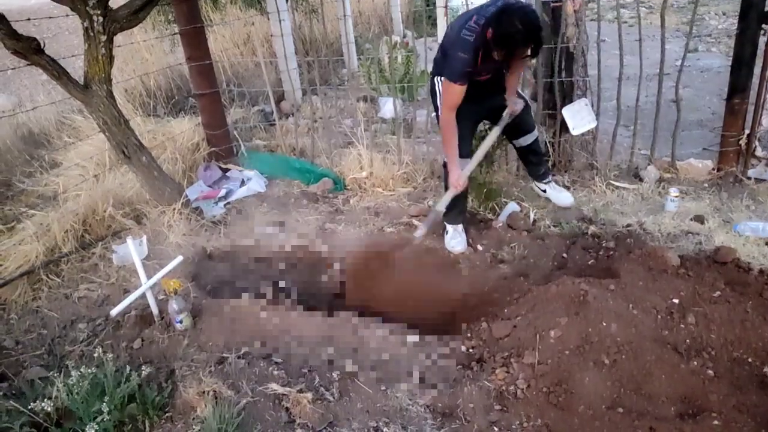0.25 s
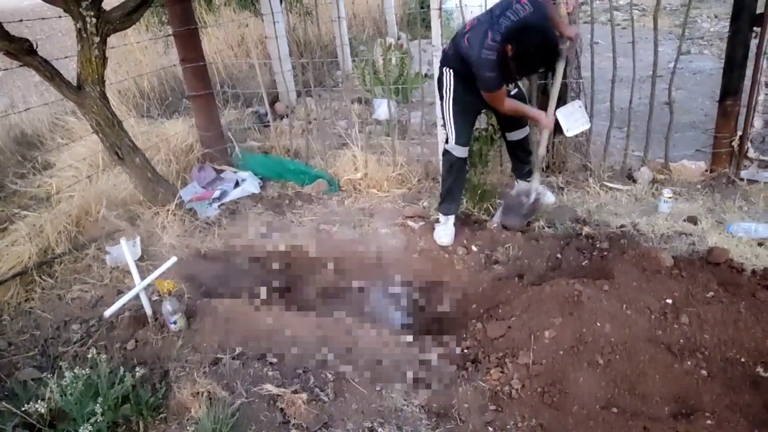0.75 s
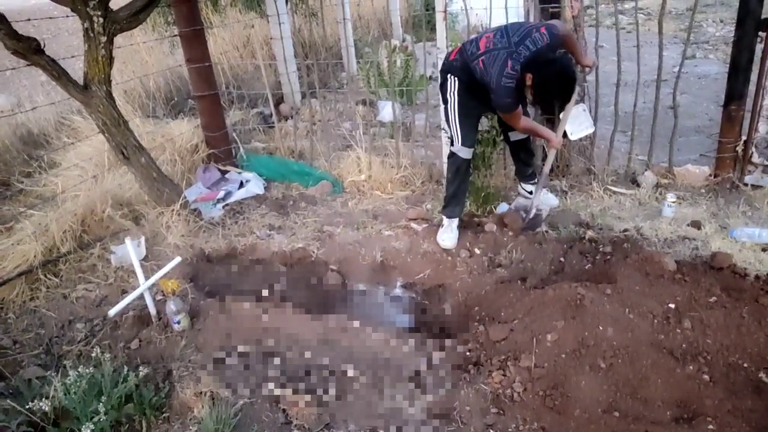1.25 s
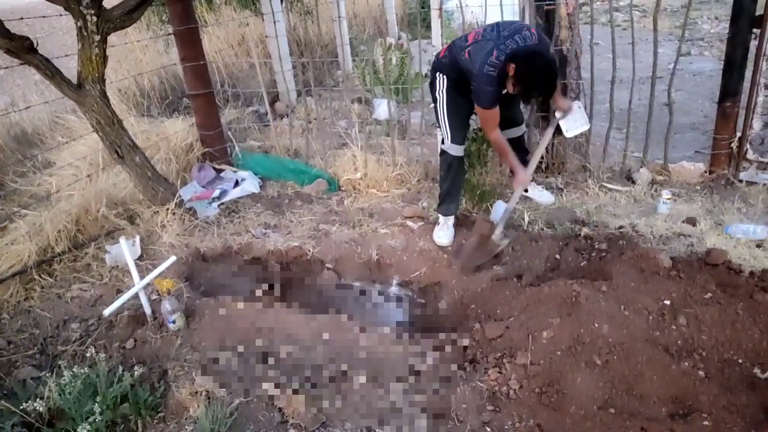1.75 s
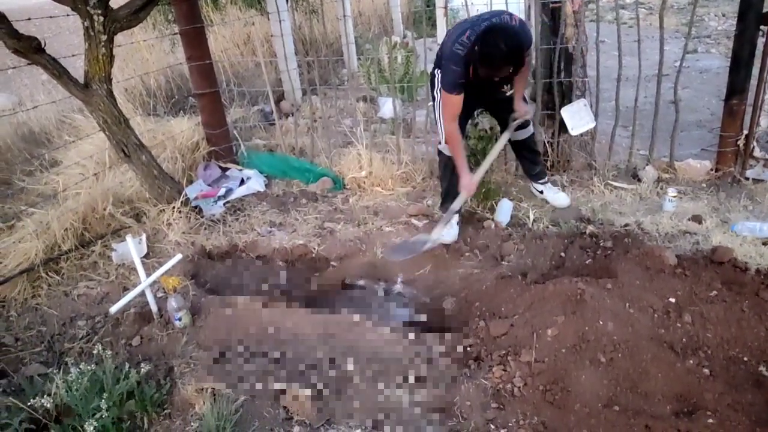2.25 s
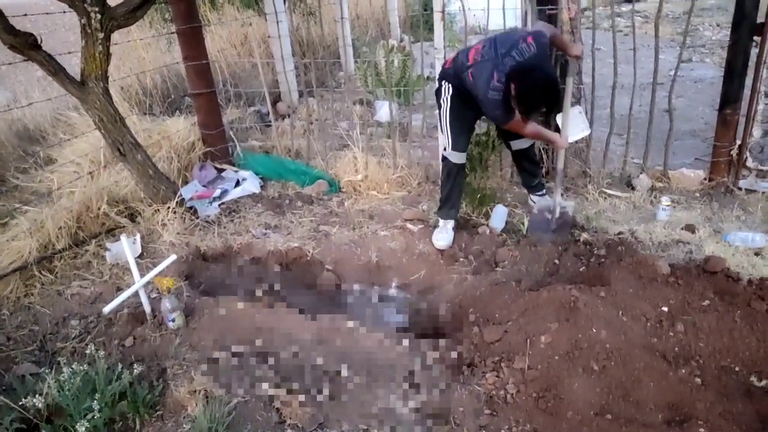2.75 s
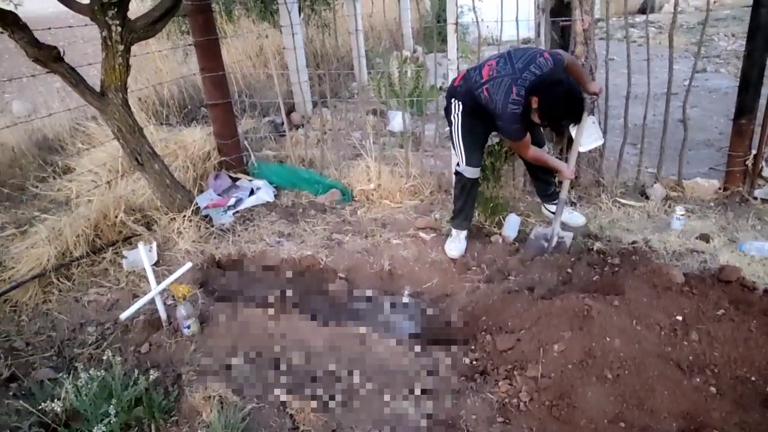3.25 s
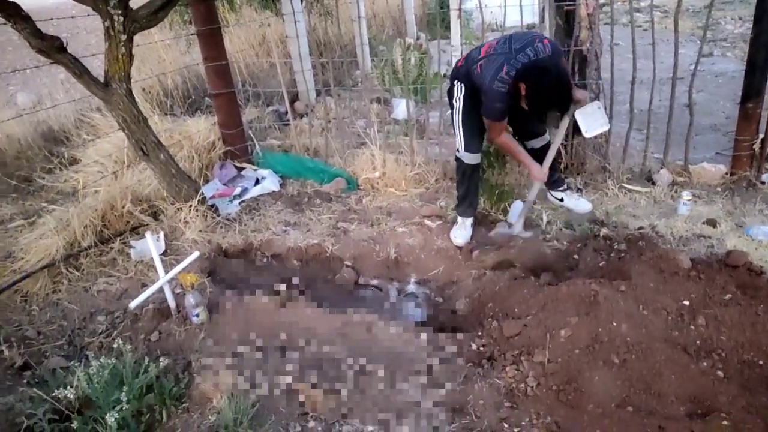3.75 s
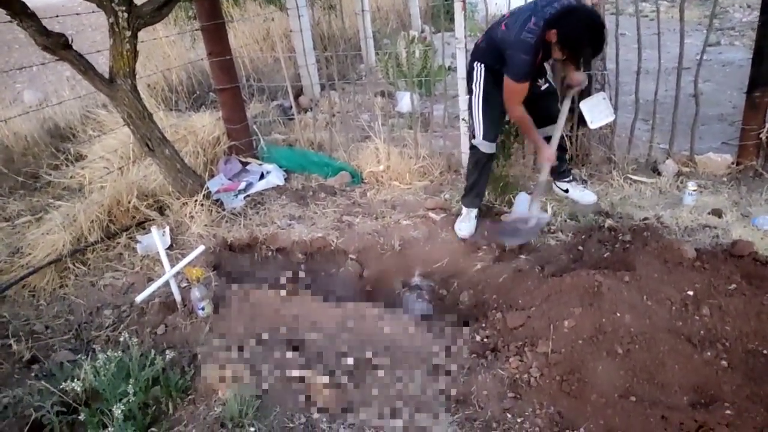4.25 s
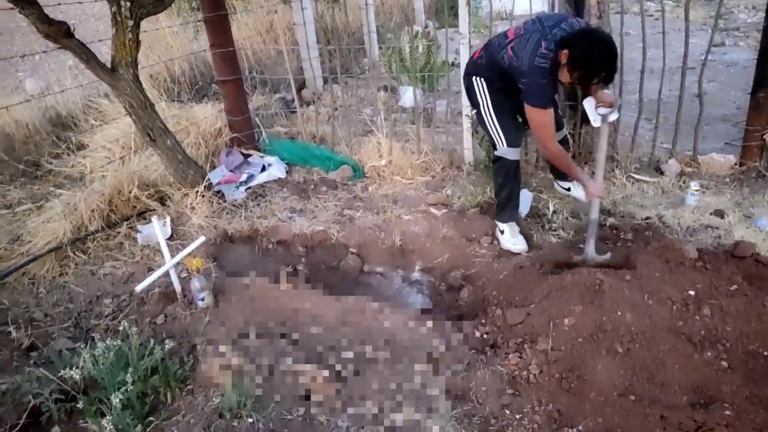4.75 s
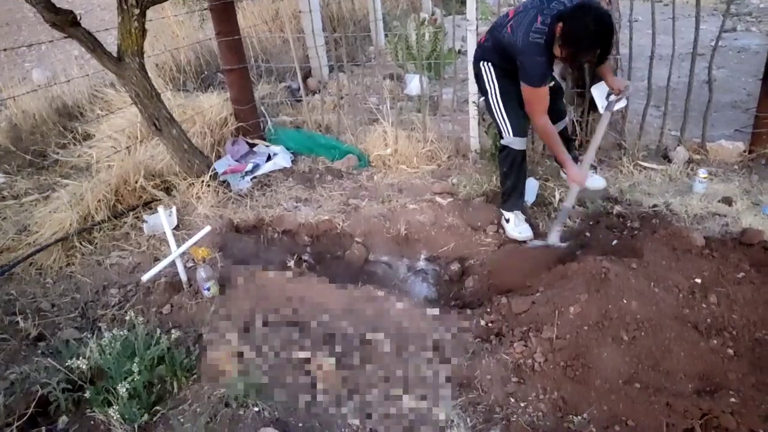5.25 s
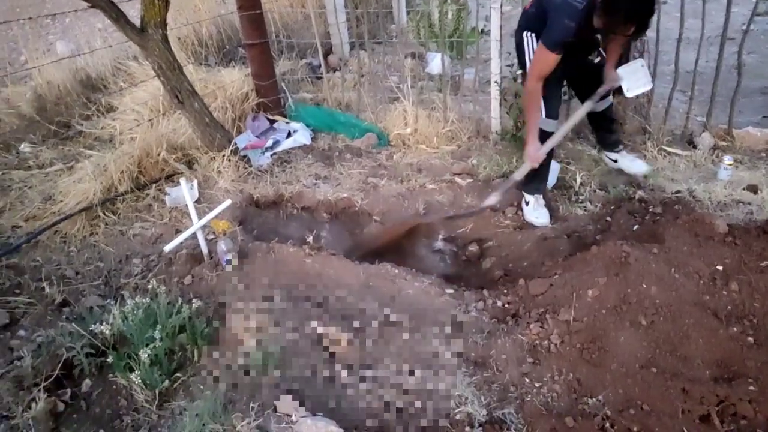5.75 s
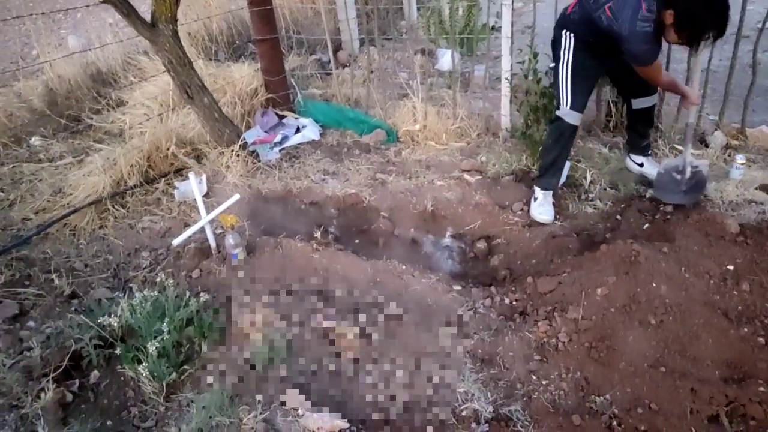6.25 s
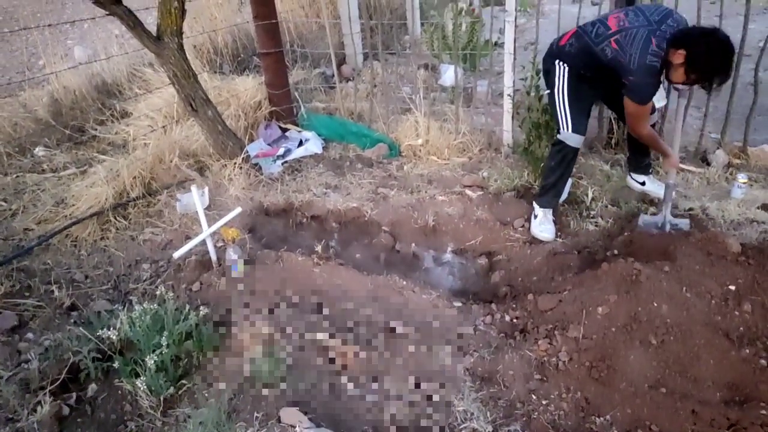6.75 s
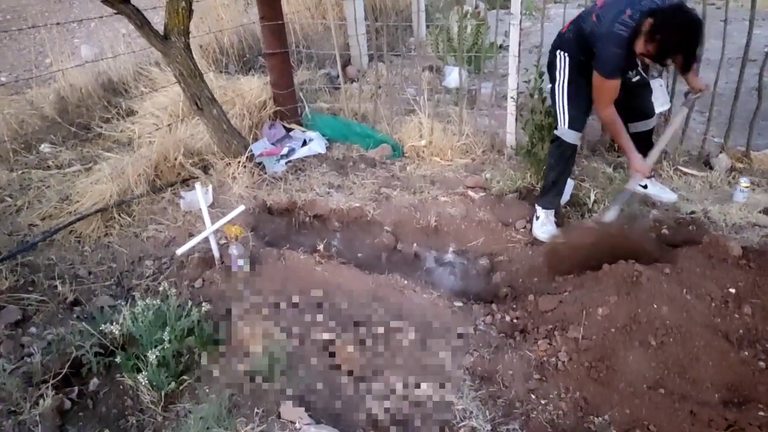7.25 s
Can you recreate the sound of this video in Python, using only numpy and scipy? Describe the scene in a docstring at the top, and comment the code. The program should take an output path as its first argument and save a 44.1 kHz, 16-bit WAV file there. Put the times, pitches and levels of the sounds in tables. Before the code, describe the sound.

Somebody shovels loose gravelly soil into a hole outdoors. The blade crunches into the heap, cracks against stones, then sings briefly as earth slides off and patters down. Bright clangs come in the first two seconds and near four; later strokes are sparser and duller. Quiet airy hiss and low wind buffeting surround the close, dry stereo phone pickup, with almost no echo.

```python
"""A steel shovel digs dry stony soil and tosses it into a hole, outdoors, a few metres from a phone.
First soil trickles, a toss makes the blade sing and stones knock; then pushes, blows and tosses alternate.
Contact noise drives the blade's modes, muffled in the ground and ringing in the air; pebbles tick throughout.
Filtered noise gives light wind, rumbling and popping on the two microphone ports; trickling soil ends the scene."""
import sys
import numpy as np
from scipy import signal
from scipy.fft import rfft, irfft
from scipy.io import wavfile

SR = 44100
rng = np.random.default_rng(int(sys.argv[2]) if len(sys.argv) > 2 else 0)


def persist_wave(psi):
    """Save psi, clipped to +-1, as 16-bit WAV."""
    counts = np.round(np.clip(psi, -1, 1) * 32767).astype(np.int16)
    wavfile.write(sys.argv[1], SR, np.atleast_2d(counts).T)


N = 329868
TIME = np.arange(N) / SR


def undb(db):
    """Logarithmic level: decibels to amplitude gain."""
    return np.exp(np.asarray(db) * (np.log(10) / 20))


def unit(x):
    """Normalisation: scale to rms 1."""
    return x / np.sqrt(np.mean(x ** 2))


def pan(pan_db):
    """Level difference: left and right gains, as a column, for left minus right in dB."""
    return undb([[pan_db / 2], [-pan_db / 2]])


def port_shares(pan_db):
    """Constant power: left and right gains whose squares sum to 1."""
    pair = pan(pan_db)
    return pair / np.hypot(*pair)


def add(track, s, sound):
    """Superposition: mix a sound into a track at time s."""
    start = max(int(s * SR), 0)
    part = sound[..., :N - start]
    track[..., start:start + part.shape[-1]] += part


def convolve(x, response):
    """Linear filtering: pass a mono or stereo sound through an impulse response."""
    if x.ndim > 1:
        response = response[None]
    return signal.oaconvolve(x, response, axes=-1)[..., :x.shape[-1]]


def response_of(points, size=2048):
    """Minimum phase: causal impulse response of a (Hz, dB) spectrum, by folding its cepstrum."""
    hz, db = np.transpose(points)
    grid_hz = np.linspace(1, SR / 2, size // 2 + 1)
    log_gain = np.log(undb(np.interp(np.log(grid_hz), np.log(hz), db)))
    cepstrum = irfft(log_gain)
    cepstrum[1:size // 2] *= 2
    cepstrum[size // 2 + 1:] = 0
    return irfft(np.exp(rfft(cepstrum)))


def colour(x, points):
    """Spectral shaping: filter with the given spectrum."""
    return convolve(x, response_of(points))


def tint(x, points):
    """Power-preserving shaping: a white input keeps its power."""
    response = response_of(points)
    return convolve(x, response / np.linalg.norm(response))


def walk(rate):
    """Random modulation: wander of rms 1 through `rate` random points a second."""
    steps = rng.standard_normal(N // 20)
    return unit(np.interp(TIME * rate, np.arange(len(steps)), steps))


def fade(t, t60):
    """Exponential decay: down 60 dB after t60, in the unit of t."""
    return np.exp(-np.log(1000) * t / max(t60, 1e-3))


def swell(s, rise_s, hold_s, fall_s):
    """Exponential envelope: reaches 1 at time s, holds, dies away; rise and fall times are for 20 dB."""
    early, late = np.maximum(s - TIME, 0), np.maximum(TIME - s - hold_s, 0)
    steps = early / max(rise_s, 1e-3) + late / max(fall_s, 1e-3)
    return undb(-20 * np.minimum(steps, 10))


# Spectrum of the open air. Each row: frequency in Hz, level in dB.
AIR_SPECTRUM = [(88, -20), (150, -6.5), (215, -4), (443, 2), (1100, -20.5), (3440, -18.5), (3710, -18),
                (4750, -25.5), (5420, -21), (6310, -23.5), (8550, -21), (10700, -29), (14000, -13.5)]


def air():
    """Partly coherent noise field: quiet open country whose lows are shared by both ports, the hiss not."""
    shared = colour(rng.standard_normal(N), [(100, 4.5), (800, -4), (2500, -6.5), (8000, -11.0)])
    own_spectrum = [(100, -7.0), (400, -11.5), (1000, 4.0), (3000, -6.0), (8000, -4.5)]
    own = [colour(rng.standard_normal(N), own_spectrum) for _ in range(2)]
    both = np.array([unit(colour(shared + x, AIR_SPECTRUM)) for x in own])
    return both * undb(-56 + 3.6 * walk(6.05))


# Spectrum of wind turbulence. Each row: frequency in Hz, level in dB.
RUMBLE_SPECTRUM = [(15, 0.5), (35, -2.5), (60, -2.5), (110, -10), (200, -22), (400, -41), (1000, -92)]
# Gusts on the ports. Each row: time of full strength in seconds, hold in seconds, level in dB,
# left minus right in dB.
GUSTS = [(0.051, 0.079, -38.5, -0.5), (0.48, 0.018, -29, 24), (0.614, 0.18, -33, -32), (1, 0.04, -36.5, 2),
         (1.473, 0.14, -30, 12), (1.984, 0.13, -36.5, -18), (3.038, 0.11, -30.5, 14),
         (3.22, 0.085, -36, -6), (3.616, 0.1, -28.5, -30), (3.96, 0.081, -41, -20), (4.2, 0.15, -50, 14),
         (4.947, .02, -40, 15), (5.807, 0.03, -39.5, -2), (6.657, 0.13, -32.5, -13),
         (7.095, 0.044, -31.5, -6), (7.35, 0.046, -40.5, -4)]
# Eddies popping on a port. Each row: start in seconds, level in dB, pitch in Hz, left minus right in dB.
POPS = [(0.685, -12, 114.5, -32), (0.758, -17, 119, -27), (1.352, -12.5, 71, 30), (1.371, -12.5, 159, 14),
        (1.453, -10, 185, 30), (1.535, -11, 115, 34.5), (1.612, -8.5, 121, 64), (2, -11, 145, -29),
        (3.609, -9.5, 257, -34), (3.629, -8.5, 300, -34), (3.679, -0.5, 208, -38), (3.702, -6, 118, -38),
        (3.764, -8, 83, -33), (7.099, -6.5, 100, -26), (7.126, -11.5, 203, -28)]
BREEZE_DB, GUST_RISE_S, GUST_FALL_S = -50, 0.1, 0.15  # steady wind; 20 dB rise and fall of a gust
POP_CYCLES, POP_ONSET_S = 3.16, 0.011  # cycles until a pop is 60 dB down; time scale of its onset


def wind():
    """Turbulent pressure: each port rumbles separately; single eddies pop as one damped swing."""
    strength = undb(BREEZE_DB)
    for s, hold_s, db, side_db in GUSTS:
        gust = undb(db) * port_shares(side_db) * swell(s, GUST_RISE_S, hold_s, GUST_FALL_S)
        strength = np.hypot(strength, gust)
    rumble = [unit(colour(rng.standard_normal(N), RUMBLE_SPECTRUM)) * undb(3.4 * walk(22)) for _ in range(2)]
    out = strength * np.array(rumble)
    t = TIME[:SR // 10]
    for s, db, hz, side_db in POPS:
        swing = np.sin(2 * np.pi * hz * t) * fade(t, POP_CYCLES / hz) * (1 - fade(t, POP_ONSET_S))
        add(out, s, undb(db) * port_shares(side_db) * swing)
    return out


def grains(per_s, spread_db):
    """Random impulse train: grain impacts of unequal size, each radiating unevenly to the two ports."""
    hit = rng.random(N) < per_s / SR
    size = undb(spread_db * np.minimum(rng.exponential(size=N), 2 * np.pi))
    aim = 1 + .5 * rng.standard_normal((2, N))
    return unit(hit * rng.choice([-1, 1], N) * size * aim)


LOWEST_CHIP_HZ, HIGHEST_CHIP_HZ = 1500, 14000
CHIP_CYCLES = 18.6  # cycles until a chip's click is 60 dB down


def chips(per_s, spread_db):
    """Random damped oscillators: small stones click together, each at its own pitch."""
    when, pitch, size, side = rng.random((int(per_s * N / SR), 4)).T[..., None]
    index = np.arange(256)
    cycles = (LOWEST_CHIP_HZ + pitch * (HIGHEST_CHIP_HZ - LOWEST_CHIP_HZ)) * index / SR
    click = np.sin(2 * np.pi * cycles) * fade(cycles, CHIP_CYCLES)
    click = click / np.linalg.norm(click, axis=1, keepdims=True)
    click = click * undb(-spread_db * np.log(size + .02))  # many small clicks, a few large
    at = ((when * N).astype(int) + index).ravel()
    ports = [np.bincount(at, (click * aim).ravel(), N)[:N] for aim in (.5 + side, 1.5 - side)]
    return unit(np.array(ports))


# Spectra of grit and of clods. Each row: frequency in Hz, level in dB.
GRIT_SPECTRUM = [(1500, -31), (4000, -21), (6300, -12.5), (7500, -6.5), (9000, -6.5), (11000, 5.5),
                 (14000, 3.5)]
CLOD_SPECTRUM = [(200, 4.5), (500, 10), (1100, 3), (2300, -1.5), (4000, -1), (7000, -17), (12000, 8)]
# Loose soil slipping and trickling. Each row: time of full flow in seconds, rise in seconds,
# hold in seconds, fall in seconds, level in dB, dull part relative to it in dB.
TRICKLES = [(0.136, .4, 0.33, 0.11, -51.5, -6.5), (0.876, 0.017, 0.018, 0.24, -56.5, 7),
            (3.13, 0.14, 0.044, 0.44, -51, -5.5), (3.494, 0.49, 0.091, .1, -75.5, -18),
            (2.357, 0.092, 0.082, 0.099, -49, -9.5), (4.534, 0.59, 0.064, 0.15, -51.5, -3),
            (4.82, 0.04, 0.18, 0.17, -59, 3.5), (5.171, 0.088, 0.0067, 0.41, -42, -9),
            (5.545, 0.08, 0.054, 0.12, -60, 5.5), (6.114, 0.13, 0.016, 0.049, -46, -17),
            (6.236, 0.017, 0.0073, 0.034, -60.5, -25), (6.498, .03, 0.0099, 0.068, -48, 2),
            (6.676, 0.29, 0.037, 0.22, -59.5, 4.5), (7.03, .1, 0.68, .2, -56.5, -29)]
# thrown soil lands after it has left the blade
FLIGHT_S, LANDING_RISE_S, LANDING_FALL_S, LANDING_DULL_DB = 0.11, 0.14, 0.48, -7
STRAY_PER_S, STRAY_DB = 99, -12.5  # coarse grit among the crumbs: ticks a second, level relative to the flow


def trickling():
    """Granular flow: crumbs and clods patter onto the heap, after each toss and when loose soil slips."""
    landings = []
    for s, _, hold_s, *_, landing_db in TOSSES:
        full_flow_s = s + hold_s + FLIGHT_S
        landings.append((full_flow_s, LANDING_RISE_S, 0, LANDING_FALL_S, landing_db, LANDING_DULL_DB))
    fine, dull = 0, 0
    for *shape, db, dull_db in landings + TRICKLES:
        flow = undb(db) * swell(*shape)
        fine = np.hypot(fine, flow)
        dull = np.hypot(dull, undb(dull_db) * flow)
    crumbs = unit(colour(grains(per_s=5900, spread_db=-0.5), GRIT_SPECTRUM))
    clods = unit(colour(grains(per_s=2200, spread_db=0.5), CLOD_SPECTRUM))
    coarse = undb(STRAY_DB) * unit(colour(chips(per_s=STRAY_PER_S, spread_db=6.5), GRIT_SPECTRUM))
    patter = fine * (crumbs + coarse) + undb(5.5) * dull * clods
    return patter * unit(undb(1.0 * walk(28)))


# Spectrum of the ground. Each row: frequency in Hz, level in dB.
EARTH_SPECTRUM = [(60, -17), (170, -2.5), (330, 7.5), (520, 1.5), (720, 4.5), (950, 3.5), (1200, -0.5),
                  (2000, -4), (4000, -42)]
# Clods dropping on soft ground. Each row: start in seconds, level in dB, 60 dB decay in seconds.
THUDS = [(0.746, -48.5, 0.28), (0.772, -48, 0.12), (1.222, -33, 0.063), (1.256, -30.5, 0.11),
         (2.799, -40, 0.091), (2.862, -44, .15), (4.357, -49, 0.074), (4.434, -48, 0.049),
         (4.553, -51, 0.2), (4.823, -41.5, 0.09), (5.72, -53, 0.28), (6.409, -34, 0.12), (6.453, -39, 0.17)]


def thuds():
    """Soft impact: a clod on yielding ground excites only a dull, decaying knock."""
    out, t = np.zeros(N), TIME[:SR // 4]
    for s, db, t60 in THUDS:
        force = rng.standard_normal(len(t)) * fade(t, t60)
        add(out, s, undb(db) * tint(force, EARTH_SPECTRUM))
    return out


# Single pebbles ticking. Each row: start in seconds, tick level in dB, tick pitch in Hz,
# crumble level in dB, dull part relative to the crumble in dB, 60 dB decay of the crumble in seconds.
PEBBLES = [(0.102, -21, 11620, -24, -15, 0.011), (0.1551, -19, 6840, -22, -14, 0.0041),
           (.525, -34, 9050, -35.5, 0, 0.025), (.697, -26, 10000, -33, -20, 0.0053),
           (1.172, -31, 2200, -41, 8, 0.076), (1.39, -38, 3000, -40.5, 17.5, 0.038),
           (1.572, -23, 8000, -37.5, -1.5, 0.23), (2.018, -23.5, 6000, -31.5, -7.5, 0.087),
           (2.107, -25, 10000, -34, -16, 0.0065), (3, -20, 10000, -25, -7, .015),
           (3.562, -20, 8750, -34, 0, 0.0079), (4.508, -33, 10000, -29, -18, 0.046),
           (4.892, -18, 9000, -35.5, -7, 0.025), (4.958, -25, 6500, -31, -9, 0.03),
           (5.027, -33, 11000, -37.5, -20, 0.13), (5.042, -32, 5000, -45.5, 5.5, 0.11),
           (5.503, -29, 5060, -41, 0, 0.011), (5.842, -29, 10000, -37, -14, .008),
           (6.068, -24, 9800, -38, -11, .015), (6.642, -43, 9000, -38.5, -11, .02),
           (7.181, -47, 5000, -54.5, 17, 0.03), (7.302, -30.5, 2370, -67, 12, 0.031)]
TICK_CYCLES = 2.65  # cycles until a tick is 60 dB down


def pebbles():
    """Hard impact: each pebble gives one tick at its own pitch and crumbles the soil under it."""
    out, t = np.zeros(N), TIME[:SR // 10]
    for s, tick_db, hz, crumble_db, dull_db, t60 in PEBBLES:
        tick = undb(tick_db) * np.sin(2 * np.pi * hz * t) * fade(hz * t, TICK_CYCLES)
        force = rng.standard_normal(len(t)) * fade(t, t60)
        crumble = tint(force, GRIT_SPECTRUM) + undb(dull_db) * tint(force, CLOD_SPECTRUM)
        add(out, s, tick + undb(crumble_db) * crumble)
    return out


# share by which soil detunes a mode, per unit of damping above 2
LOAD_DETUNE = .004


def ring(modes, damping, tilt_db=0, spread_db=1):
    """Modal synthesis, energy 1: the contact place weights the modes, soil shortens and detunes them."""
    t = TIME[:int(SR * .4 / max(damping, 1))]
    response = np.zeros(len(t))
    draws = rng.uniform(-0.91, 1, (len(modes), 3))
    for (hz, db, t60), (weight, load, phase) in zip(modes, draws):
        size = undb(db + spread_db * weight + tilt_db * np.log2(hz)) / np.sqrt(t60)
        life = t[:int(SR * t60 / max(damping, .5))]
        loaded_hz = hz * (1 + LOAD_DETUNE * load * max(damping - 2, 0))
        swing = np.sin(2 * np.pi * loaded_hz * life + np.pi * phase)
        add(response, 0, size * fade(life * damping, t60) * swing)
    return response / np.linalg.norm(response)


# Modes of the steel blade. Each row: frequency in Hz, energy in dB, 60 dB decay in the air in seconds.
BLADE_MODES = [(1152, -15, .26), (1450, -3.5, .62), (1503, -4, .2), (1588, -10, .3), (1890, -5.5, .11),
               (1945, -4.5, .1), (2256, -8.5, .16), (2420, -15, .08), (2541, -10, .15), (2700, -9, .1),
               (2832, -9, .15), (2960, -11, .1), (3050, -13, .35), (3130, -9, .1), (3255, -10, .22),
               (3352, -3.5, .31), (3537, -10, .14), (3620, -11, .1), (3779, -10, .12), (4010, -10, .1),
               (4178, -9, .14), (4500, -10, .07), (4750, -10, .12), (5030, -10, .08), (5329, -11, .14),
               (5432, -11, .15), (5530, -12, .12), (5792, -12, .1), (6200, -13, .08), (7250, -10, .1),
               (7390, -6, .12), (7650, -7, .14), (7782, -8, .12)]
# The blade springs free of its load and sings on. Each row: start in seconds, level in dB,
# ring brightness in dB per octave, damping by the soil left on it (1 = in the air).
CLANGS = [(0.88, -7, -1, 1.1), (1.888, -9.5, -5, 1.2), (4.098, -7, -8, 1.2), (4.16, -10, 5, 1.1)]
# Loose stones knocked together. Each row: start in seconds, level in dB, pitch in Hz,
# 60 dB decay in seconds.
CLINKS = [(1.276, -24.5, 2460, 0.04), (2.799, -28.5, 1980, 0.1), (2.871, -32, 2520, 0.04),
          (5.563, -48.5, 1670, 0.1)]


def ringing():
    """Free vibration: the unloaded blade rings in its low modes; stones clink, each at its own pitch."""
    out, t = np.zeros(N), TIME[:SR // 5]
    for s, db, tilt_db, damping in CLANGS:
        add(out, s, undb(db) * ring(BLADE_MODES, damping, tilt_db))
    for s, db, hz, t60 in CLINKS:
        add(out, s, undb(db) * np.sin(2 * np.pi * hz * t) * fade(t, t60))
    return out


# High modes that grit excites. Each row: frequency in Hz, energy in dB, 60 dB decay in the air in seconds.
SHIMMER_MODES = [(8642, -3, .17), (8770, -3, .13), (8824, -4, .14), (8994, -3, .16), (9301, 0, .12),
                 (9350, 0, .12), (10055, -3, .14), (10365, -1, .12), (10646, -1, .1), (10856, -2, .1),
                 (11693, -3, .12)]
# Spectrum of the blade's crunch. Each row: frequency in Hz, level in dB.
CRUNCH_SPECTRUM = [(400, -18.5), (750, -8.5), (1250, -6.5), (1480, 0.5), (1720, -16), (2000, -9), (2600, 0),
                   (2880, -4.5), (3350, -1.5), (3780, -9), (4500, -2.5), (6000, -13), (8000, -2)]
# turns a second of the contact over the blade; how much a mode depends on the place touched
SLIDE_PER_S, PLACE_SPREAD_DB = 4.93, 1.5


def shovel(grit, steel, earth, damping, ring_db, shimmer_db, tilt_db=0):
    """Source and filter: contact forces become hiss, crunch, dull ground and a ring that shifts in the slide."""
    slide = 2 * np.pi * SLIDE_PER_S * TIME[:steel.shape[-1]]
    body = 0
    for share in (np.cos(slide), np.sin(slide)):  # two contact places exchange the force
        body = body + convolve(steel * share, ring(BLADE_MODES, damping, tilt_db, PLACE_SPREAD_DB))
    hiss = undb(2.5) * tint(grit, GRIT_SPECTRUM)
    crunch = undb(-0.5) * tint(steel, CRUNCH_SPECTRUM)
    ground = undb(-1.5) * tint(earth, EARTH_SPECTRUM)
    shimmer = undb(shimmer_db) * convolve(grit, ring(SHIMMER_MODES, damping))
    return hiss + crunch + ground + undb(ring_db) * body + shimmer


def stroke(contact, force, steel_db, earth_db, damping, ring_db, shimmer_db, tilt_db=0):
    """Modulated excitation: one stroke on the blade, touching it at another place each time."""
    out, touching = np.zeros((2, N)), np.flatnonzero(force > force.max() / 1000)
    span = slice(touching[0], touching[-1] + SR // 2)  # leaves room for the ring
    grit = force[span] * contact[:, span]
    steel, earth = undb(steel_db) * grit, undb(earth_db) * grit
    out[:, span] = shovel(grit, steel, earth, damping, ring_db, shimmer_db, tilt_db)
    return out


# Soil sliding off the lifted blade. Each row: time of full force in seconds, rise in seconds,
# hold in seconds, fall in seconds, grit level in dB, steel relative to it in dB, ring in dB, shimmer in dB,
# damping by the soil still on it, ring brightness in dB per octave, left minus right in dB,
# landing level in dB.
TOSSES = [(0.367, 0.11, 0.043, 0.091, -28.5, -8.5, -9, -9.5, 3, 0, 1, -43),
          (1.8, 0.03, 0.047, 0.046, -22.5, -4, -2.5, -3.5, 2.15, 3.5, -3.5, -47.5),
          (1.877, 0.031, 0.03, 0.022, -27.5, -15, -1.5, -5, 1.8, -1, -6, -61),
          (2.143, 0.1, 0.041, 0.072, -38.5, -10.5, -0.5, -5.5, 1.1, 4, 4.5, -55.5),
          (4.078, 0.101, 0.022, 0.076, -29, -3.5, -5.5, -26, 0.6, 2, 0, -67),
          (5.665, 0.11, 0.05, 0.077, -34, -4.5, -7.5, -8.5, 2.5, 3.5, 1.5, -43)]
TOSS_EARTH_DB = -33  # dull part, relative to the grit


def tossing():
    """Excitation by granular flow: soil and stone chips stream over the free blade and make it sing."""
    contact = unit(grains(per_s=9000, spread_db=0.5) + undb(-6) * chips(per_s=900, spread_db=2.5))
    contact = contact * unit(undb(1.6 * walk(130)))
    out = 0
    for (s, rise_s, hold_s, fall_s, db, steel_db, ring_db, shimmer_db,
         damping, tilt_db, pan_db, _) in TOSSES:
        force = undb(db) * swell(s, rise_s, hold_s, fall_s)
        sound = stroke(contact, force, steel_db, TOSS_EARTH_DB, damping, ring_db, shimmer_db, tilt_db)
        out = out + pan(pan_db) * sound
    return out


# Spectrum of grinding gravel. Each row: frequency in Hz, level in dB.
GRAVEL_SPECTRUM = [(1500, -16.5), (3000, -7), (3700, -2), (4400, -2.5), (5500, 2), (6500, -6), (8000, -15),
                   (12000, -33)]


def gravel():
    """Sparse impulse noise: coarse stones grind on each other in bright cracks."""
    return tint(grains(per_s=650, spread_db=1.7), GRAVEL_SPECTRUM)


# Blade striking stones. Each row: start in seconds, grit level in dB, 60 dB decay of the grit in seconds,
# crack relative in dB, steel relative in dB, earth relative in dB, freedom of the blade from 0 to 1,
# ring in dB, ring brightness in dB per octave, left minus right in dB, gravel relative in dB.
BLOWS = [(.394, -17.5, 0.037, -10, -19, -22.5, 1, 0, 4, 3, -33),
         (0.441, -25.5, 0.082, -4, -5, -26, 1, -2, 4, 2.5, -24),
         (0.8762, -9, 0.078, -19.5, -15.5, -29, 0.98, -1.5, -5.5, -7, -20),
         (1.0456, -25.5, 0.12, 1.5, 3, -9, 0.73, -1.5, -4, 2.5, -31),
         (1.22, -33.5, 0.064, -7, -1.5, 12, 0.1, -2, 1, 0.5, -6),
         (1.2525, -22, 0.026, 3, -5.5, -3, 0.5, -5, -3, 3.5, -5),
         (1.276, -22.5, 0.073, 3, -4, -8, 0.77, 0.5, -2, 4, -23),
         (1.31, -22.5, 0.09, -7, -1.5, -11, 0.14, -5, -2, 4, -29),
         (1.7059, -22.5, 0.036, -1, -14.5, -11, 0.65, 10, 14, 1, -24),
         (1.724, -18.5, 0.078, -10, -25, -26, 0.1, -5, 3, -5, -27),
         (1.757, -8.5, 0.045, 3, -11.5, -19.5, 0.81, 1, -6, -6.5, -17),
         (1.8033, -17, 0.066, -7, -2.5, -21, 0.97, 0.5, 2.5, 0, -16),
         (1.824, -14, 0.036, -12, -6, -22, 0.6, 0.5, -2.5, -12, -17),
         (1.833, -24, 0.026, -5, 1, -15.5, 0.64, 4, 1, 6, -13),
         (1.847, -14, 0.02, -1, -9, -27, 1, -4, -2, -6, -16),
         (1.856, -26, 0.015, -1, -6, -18, 0.6, 2, -2, 0, -19),
         (2.122, -17, 0.028, -6, -23, -47, 0.8, 1, 14, -0.5, -29),
         (2.166, -32, 0.018, 5, -6.5, -28, 0.76, 0, 8, 5, -18),
         (2.797, -40, 0.061, -12, 3, -8, .5, 0, -5, 7, -20),
         (2.8604, -14.5, 0.052, 1, -10.5, -26, 0, 2.5, 17, 3.5, -24),
         (2.88, -19.5, 0.04, -5, -13, -22, 0.2, 3, 3, -1, -14),
         (2.9258, -10.5, 0.058, -4, -34, -34, 0.3, -8, 8, 0, -17),
         (2.96, -12.5, 0.042, -7, -17.5, -18, 0.9, 1, 4, -2.5, -27),
         (3.8525, -26, 0.033, 0, -13, -25, 0.9, 3, -16, 3, -28),
         (4.138, -22, 0.11, -12, -14, -25, 0.9, -0.5, 8, -2, -12),
         (4.703, -12, 0.033, 1.5, -24, -29, 0.1, 4.5, -11, -3, -22),
         (4.716, -11, 0.043, 2, -20, -22, 0.6, 2, -18, -7, -34),
         (4.758, -28.5, 0.046, -10, -9, -2.5, 0, 5.5, -2, -8.5, -26),
         (4.771, -15.5, 0.022, -0.5, -24, -40, 0.2, -0.5, 7, 2, -25),
         (6.3682, -21, 0.036, 2, -3, -0.5, 0.6, -8, 2, -10.5, -5.5),
         (6.38, -19, 0.035, -1, -3, -18, .1, 1, -8, 3, -7),
         (6.391, -26, 0.025, 0, -5, -12, 0.3, -6, -3, 4, -14)]
CRACK_T60_S, CRUSH_RISE_S = 0.0023, 0.012  # first crack, then the build-up of crushed grit


def blows():
    """Impact excitation: a stone stops the blade, cracks and is crushed; a free blade rings on."""
    out, t = np.zeros((2, N)), TIME[:SR // 3]
    contact, stones = grains(per_s=9000, spread_db=1), gravel()
    for s, db, t60, crack_db, steel_db, earth_db, free, ring_db, tilt_db, pan_db, gravel_db in BLOWS:
        crack = undb(crack_db) * fade(t, CRACK_T60_S)
        shape = crack + fade(t, t60) * (1 - fade(t, CRUSH_RISE_S))
        span = int(s * SR) + np.arange(len(t)) - len(t)  # any stretch of the steady noise will do
        force = undb(db) * contact[:, span] * shape
        damping = 1 + 25.0 * (1 - free)
        steel, earth = force * undb(steel_db), force * undb(earth_db)
        sound = shovel(force, steel, earth, damping, ring_db, shimmer_db=-28.5, tilt_db=tilt_db)
        sound = sound + undb(db + gravel_db) * stones[:, span] * shape
        add(out, s, pan(pan_db) * sound)
    return out


# Pushes of the blade through soil. Each row: time of full force in seconds, rise in seconds,
# hold in seconds, fall in seconds, grit level in dB, steel relative in dB, earth relative in dB,
# damping by the soil, left minus right in dB, gravel relative in dB.
DIGS = [(1.0216, 0.0018, 0.059, 0.068, -36.5, 2, -1, 7.9, 3, -28),
        (1.24, 0.044, 0.098, 0.026, -41.5, 4, 1, 9.3, 4.5, -16),
        (1.373, 0.013, 0.0059, 0.18, -42.5, -6.5, -4, 16, 1, -18),
        (1.724, 0.028, 0.014, 0.025, -25, -11.5, -21, 3.9, -1, -22),
        (1.76, 0.011, 0.03, 0.022, -31.5, 0, -16, 2.2, -1, -18),
        (2.794, 0.0045, 0.0057, 0.071, -30.5, -2.5, -3, 3.3, 2, -15),
        (2.859, 0.002, 0.12, 0.073, -26, -7, -16.5, 11.6, 2, -18.5),
        (3.733, 0.27, 0.42, 0.032, -43, -8, -11.5, 5.6, 1, -15),
        (3.852, 0.0083, 0.058, 0.017, -23, -12.5, -29, 2.6, 1.5, -19),
        (4.505, 0.018, .005, 0.051, -44.5, -16, -18, 8.1, 9.5, -15),
        (4.707, 0.0014, 0.054, 0.019, -21, -31, -18.5, 4.2, -4, -33),
        (6.366, 0.0016, 0.019, 0.044, -24, -6.5, -19, 5.8, 2.5, -14.5),
        (6.41, 0.031, 0.012, 0.048, -28, -9, -10.5, 14, -0.5, -18),
        (6.443, 0.016, 0.018, 0.022, -33.5, -4, -7, 9.9, -2, -14),
        (6.708, 0.026, 0.016, 0.017, -43, -8.5, -10, 11, 0.5, -29),
        (6.905, 0.052, 0.0079, 0.066, -43, -4.5, -1, 6.5, 1.5, -31),
        (6.984, 0.0086, 0.0083, 0.034, -44, -1.5, -2.5, 14, 1, -21)]
DIG_EASE_DB_PER_S, SOIL_MUTE_DB = 41, -0.66  # a push slackens as the blade slows; ring per unit of damping


def digging():
    """Frictional excitation: the blade sticks and slips through packed gravel."""
    contact = unit(grains(per_s=7500, spread_db=1.5) + undb(-6.5) * chips(per_s=900, spread_db=0.5))
    contact = contact * unit(undb(1.25 * walk(170)))
    out, stones = 0, gravel()
    for s, rise_s, hold_s, fall_s, db, steel_db, earth_db, damping, pan_db, gravel_db in DIGS:
        ease_db = DIG_EASE_DB_PER_S * np.clip(TIME - s, 0, hold_s)
        force = swell(s, rise_s, hold_s, fall_s) * undb(db - ease_db)
        ring_db = SOIL_MUTE_DB * damping
        sound = stroke(contact, force, steel_db, earth_db, damping, ring_db, shimmer_db=-17.0)
        sound = sound + undb(gravel_db) * force * stones
        out = out + pan(pan_db) * sound
    return out


# Place of the blade. Each row: time in seconds, lead of the left port in samples.
PLACE = [(0, 1), (.5, 2), (.9, 6), (1.3, 5), (1.8, 3), (2.15, 0), (2.8, 5), (3.9, 3), (4.1, 2), (4.7, 6),
         (5.6, 0), (6.4, 10), (7.4, 8)]


def yard(sound, tail_db, tail_t60):
    """Scattering: ground and blade blur the moving sound at each port; fence and trees add a faint tail."""
    t, hop, out = TIME[:SR // 3], SR // 5, np.zeros((2, N))
    for start in range(-hop, N, hop):
        index = np.arange(max(start, 0), min(start + 2 * hop, N))
        window = np.sin(np.pi * (index - start) / (2 * hop))
        lead = round(np.interp((start + hop) / SR, *np.transpose(PLACE)))
        for port, x, lag in zip(out, sound, (0, lead)):
            early = unit(rng.standard_normal(len(t)) * fade(t, .016) * (t > .0003))
            late = unit(rng.standard_normal(len(t)) * fade(t, tail_t60) * (t > .012))
            scatter = (undb(-8) * early + undb(tail_db) * late) / np.sqrt(len(t))
            # half a sample guards the rounding; scattered parts add in power, direct ones in amplitude
            add(port, (index[0] + .5) / SR, signal.fftconvolve(x[index] * window, scatter))
            add(port, (index[0] + lag + .5) / SR, undb(-1) * x[index] * window ** 2)
    return out


# Response of the microphone ports. Each row: frequency in Hz, left level in dB, right level in dB.
PORTS = [(504, -3, -3), (1675, 3.5, 1), (2190, 10, 3.5), (3140, 6.5, 0.5), (6050, 4.5, 8.5), (6970, 9, 8),
         (7070, 5, 4.5), (8920, 4.5, 15), (9620, 12, 8.5), (10490, 10.5, -7.5), (11620, 5, -9),
         (15400, -9.5, -13)]


def scene():
    """Superposition: shovel and soil in the yard, heard through the two ports, with wind."""
    background = trickling() + thuds() + pebbles()
    work = background + ringing() + tossing() + blows() + undb(1.5) * digging()
    sound = yard(work, tail_db=-26.5, tail_t60=0.61) + air()
    hz, *ports = np.transpose(PORTS)
    heard = [colour(x, np.transpose([hz, db])) for x, db in zip(sound, ports)]
    return np.array(heard) + wind()


TOP_HZ = 14350


def record(dry):
    """Saturation and band limiting: the phone rounds the very loudest peaks and cuts the top."""
    rounded = dry / (1 + (dry / .9) ** 6) ** (1 / 6)
    low_pass = signal.ellip(10, .2, 70, TOP_HZ, fs=SR, output="sos")
    return signal.sosfilt(low_pass, rounded)


dry = scene()
out = record(dry)
persist_wave(out)
```